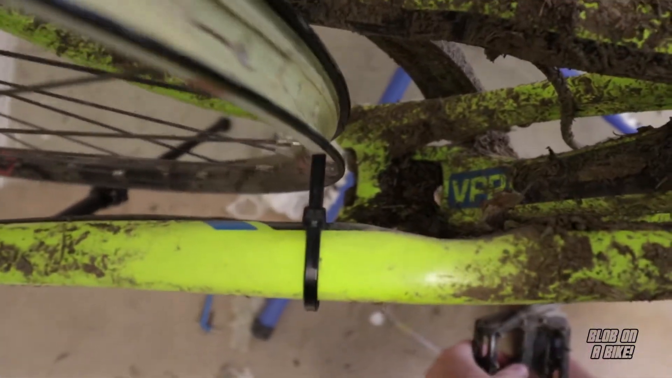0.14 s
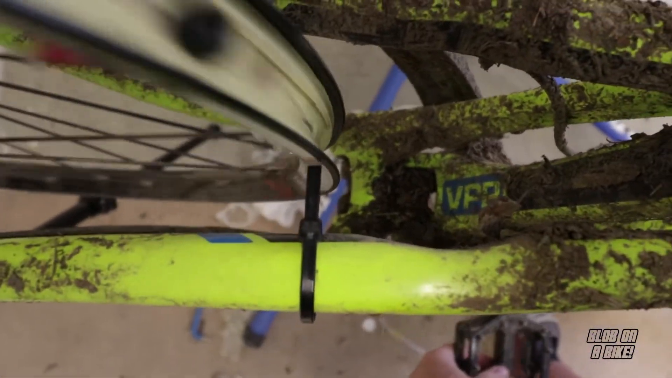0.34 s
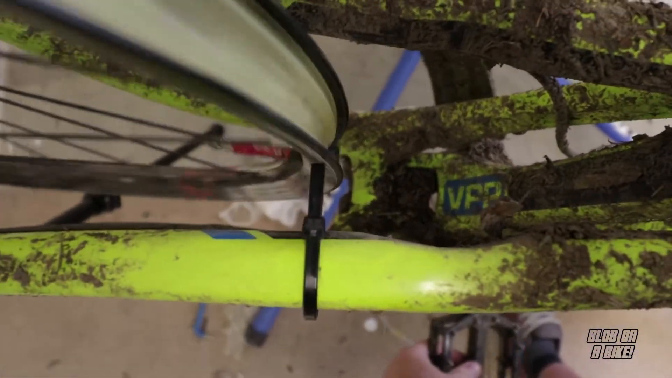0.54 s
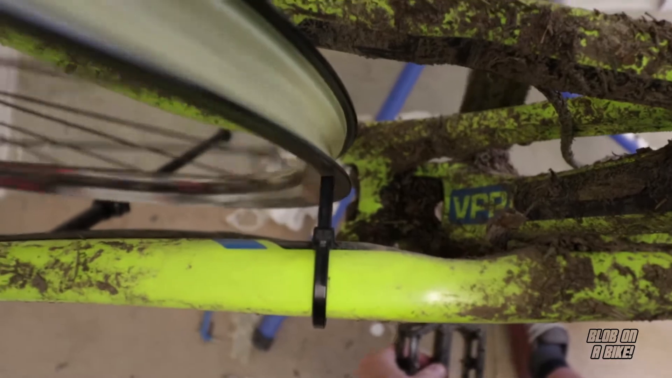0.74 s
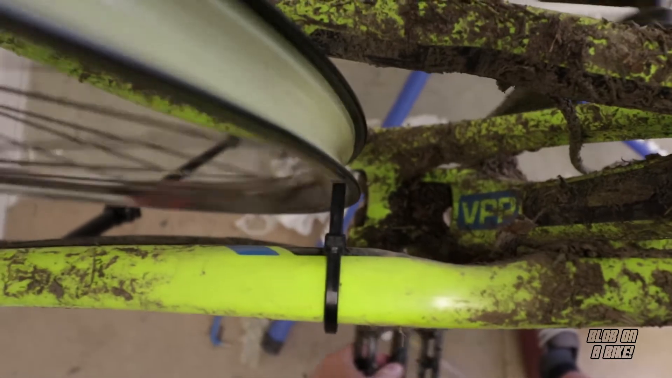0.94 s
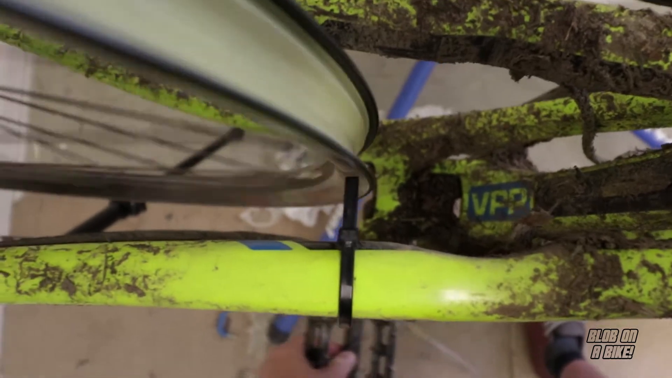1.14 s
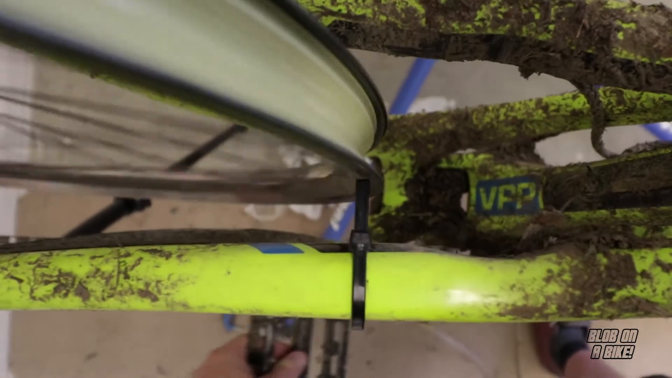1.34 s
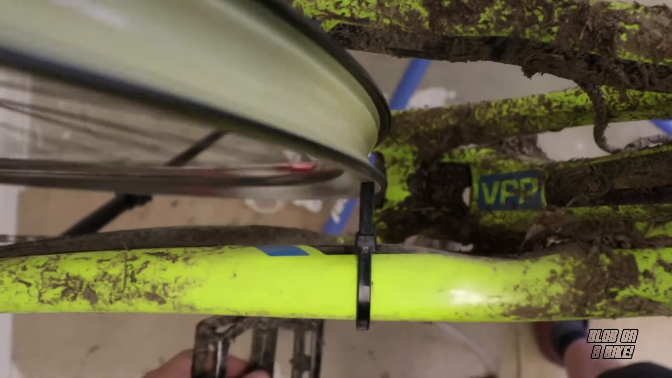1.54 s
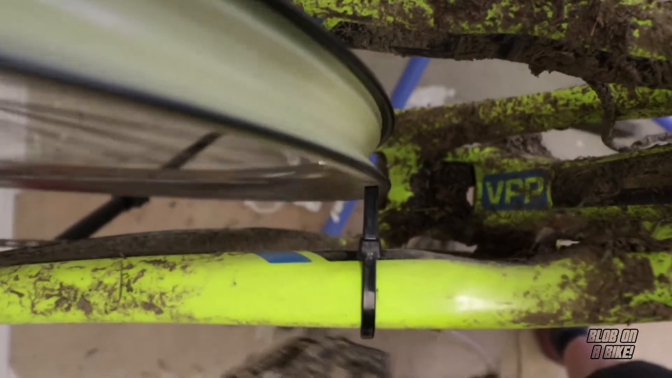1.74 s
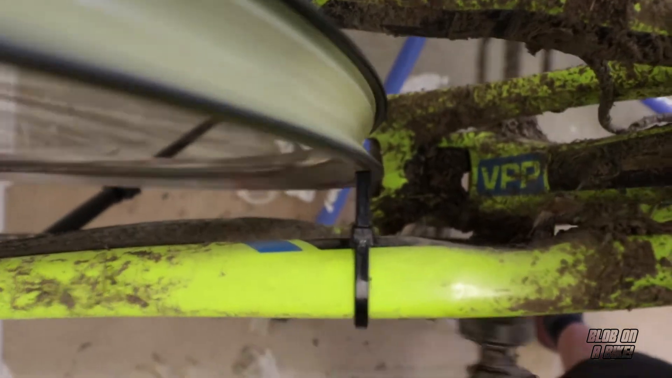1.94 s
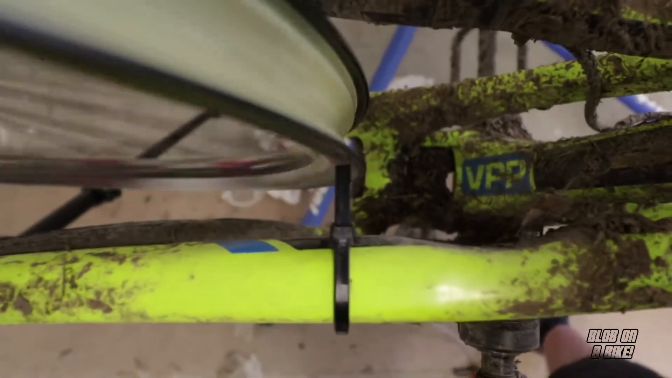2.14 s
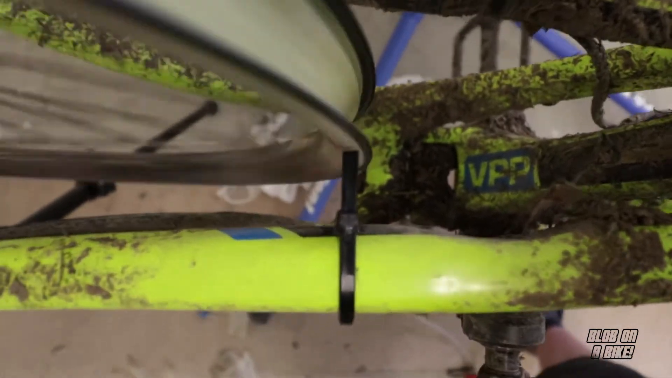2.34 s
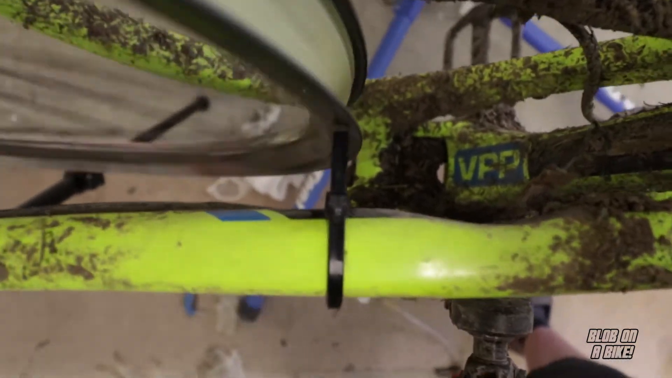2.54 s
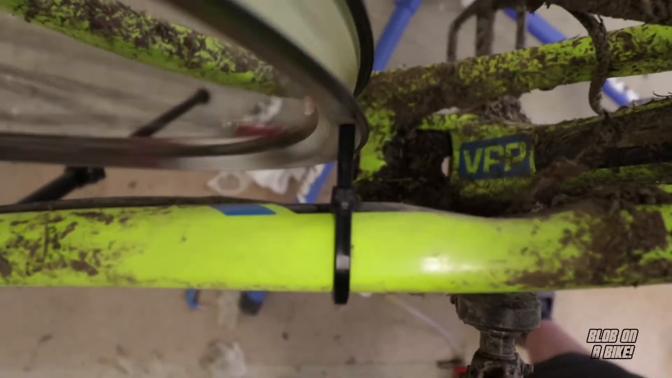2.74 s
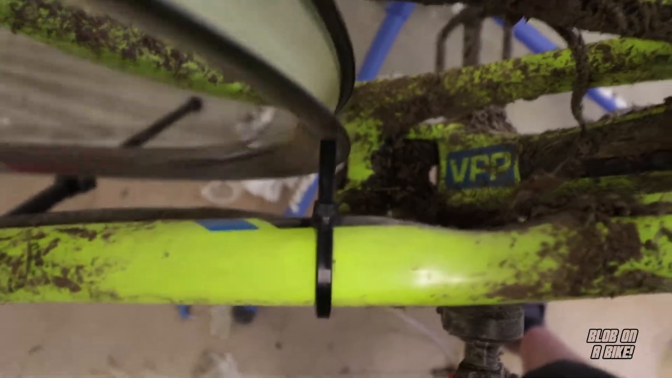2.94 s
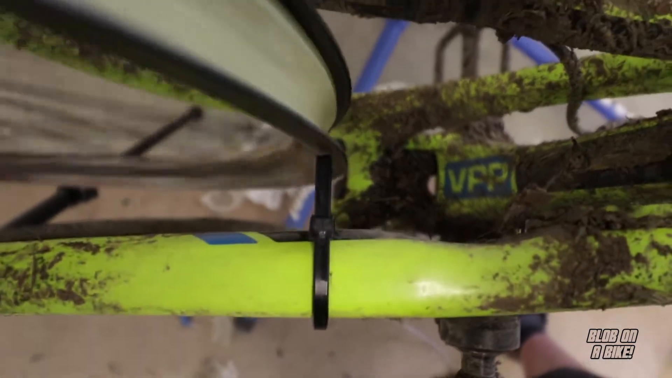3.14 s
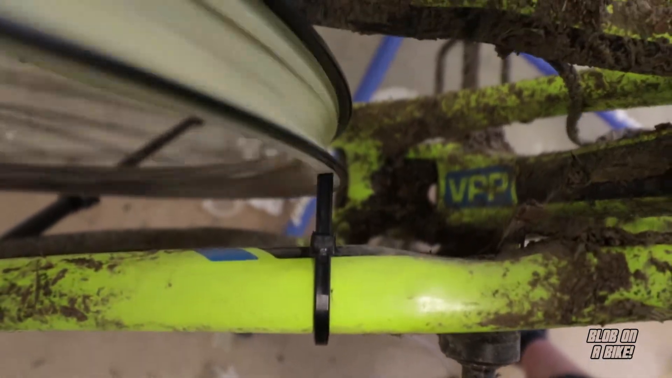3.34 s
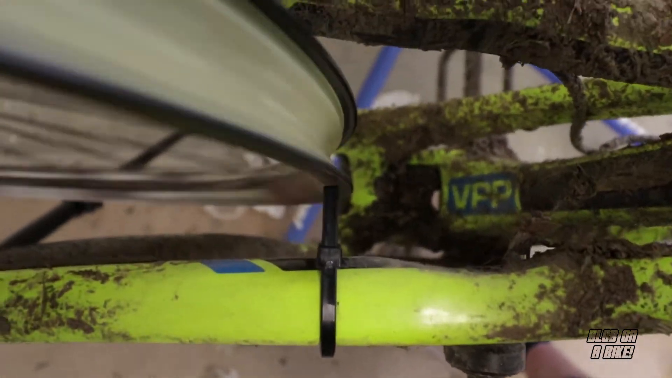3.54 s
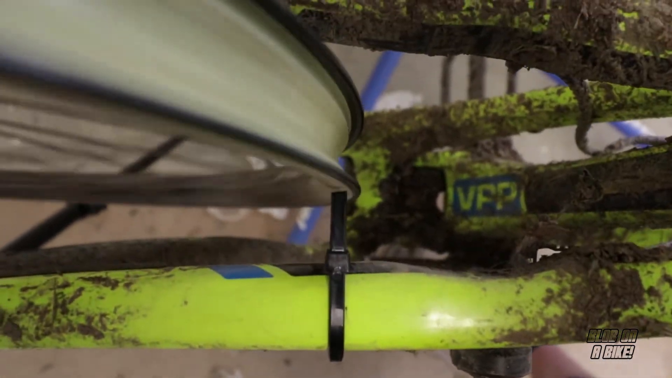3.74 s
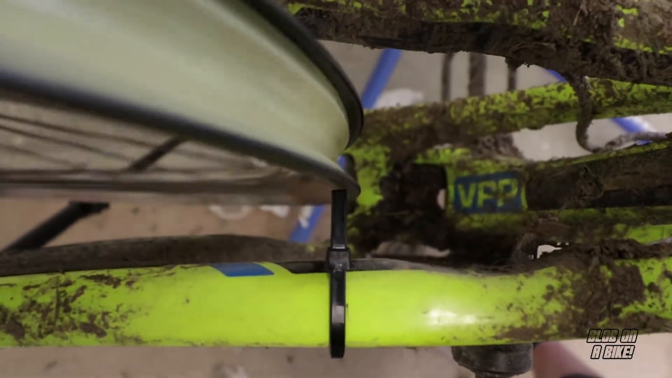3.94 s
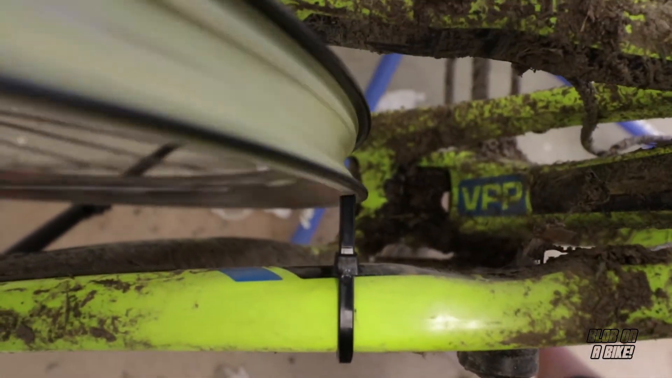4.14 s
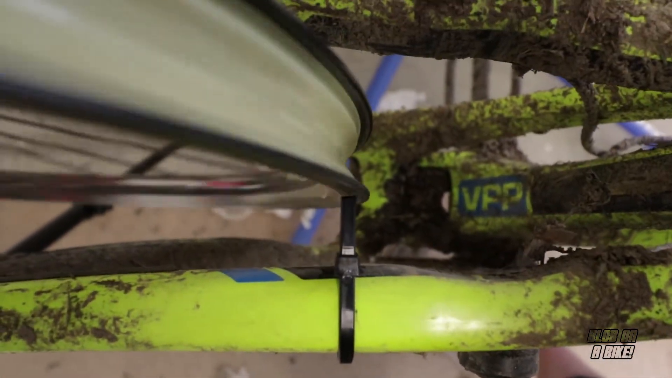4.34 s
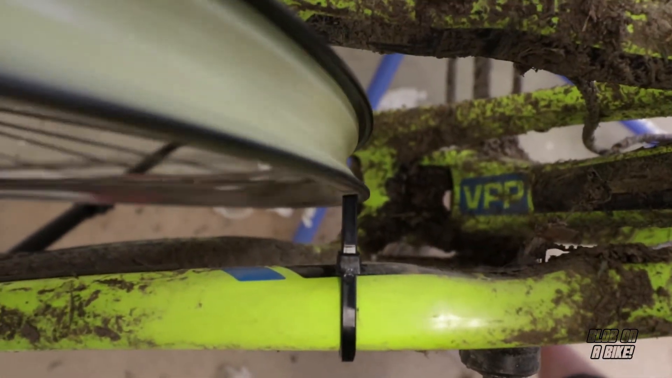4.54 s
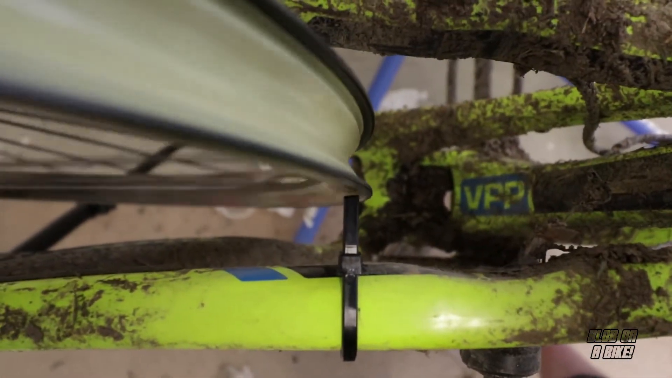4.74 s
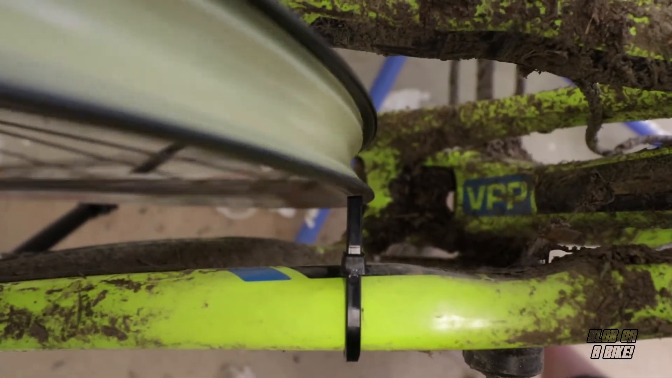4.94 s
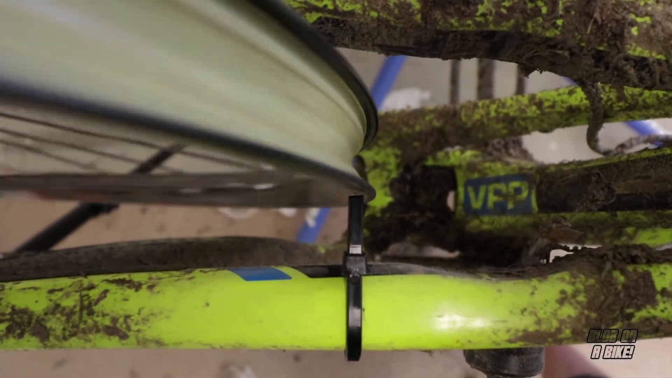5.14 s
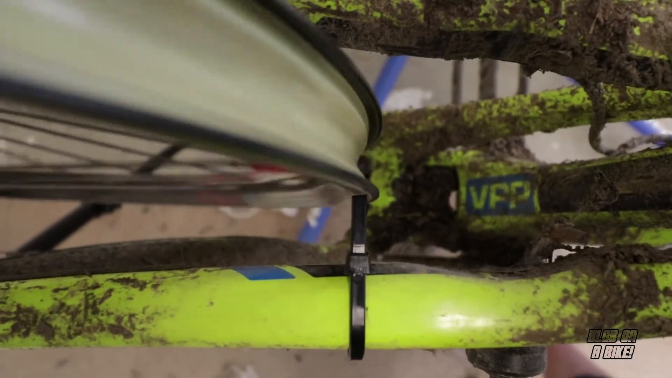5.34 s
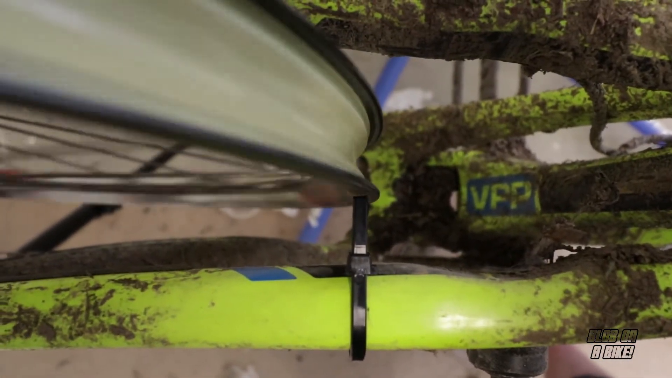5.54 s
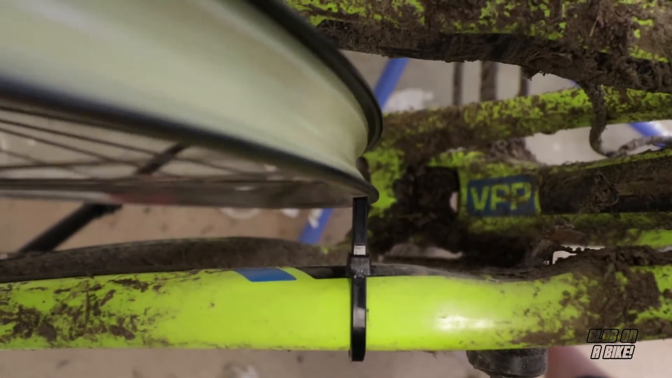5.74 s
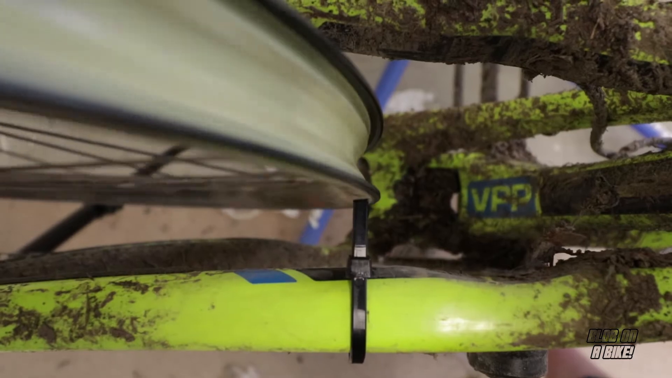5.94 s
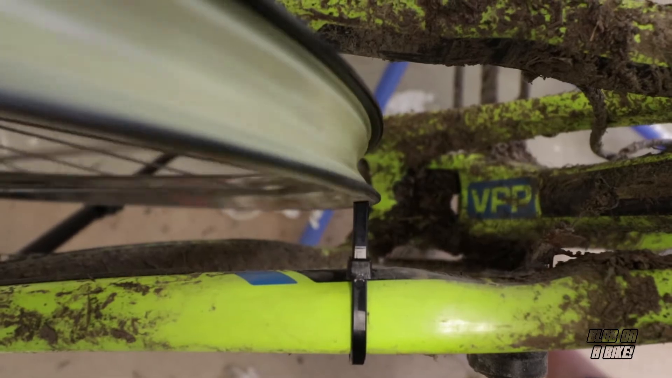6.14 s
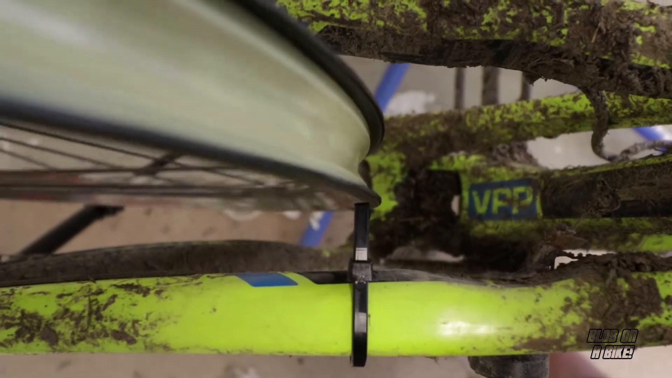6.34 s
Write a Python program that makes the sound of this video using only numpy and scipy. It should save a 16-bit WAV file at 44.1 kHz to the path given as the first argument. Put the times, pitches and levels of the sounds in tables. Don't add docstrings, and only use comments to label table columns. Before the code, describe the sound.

A small, hard-walled workshop with a faint low compressor hum. A pedal knocks, the chain ticks and dry parts rustle as a bicycle wheel is cranked by hand. After two seconds the wheel is let go and the freewheel breaks abruptly into a loud, bright metallic buzz, its fast clicks slowing steadily but still rapid at the end. One close microphone, with lively room reflections.

```python
import sys
import numpy as np
from scipy import signal
from scipy.fft import rfft, irfft
from scipy.io import wavfile
from scipy.ndimage import uniform_filter1d

SR = 44100
rng = np.random.default_rng(int(sys.argv[2]) if len(sys.argv) > 2 else 0)


def pcm_store(signal):
    levels = np.round(np.clip(np.atleast_2d(signal), -1, 1) * 32767)
    wavfile.write(sys.argv[1], SR, levels.astype(np.int16).T)


def convert_level_to_amplitude(level_db):
    exponent = np.asarray(level_db, float) / 20
    return 10 ** exponent


N = 282240
RELEASE_S = 1.986
WHEEL_TURN_TEETH = 40.115
LAST_TOOTH = 198


def unit(x):
    return x / np.sqrt(np.mean(x ** 2))


def colour(x, points):
    hz, db = np.transpose(points)
    bins = np.maximum(np.arange(N // 2 + 1) * SR / N, 1)
    gain = convert_level_to_amplitude(np.interp(np.log(bins), np.log(hz), db))
    return irfft(rfft(x) * gain, N)


def ring(x, hz, width_hz):
    return signal.lfilter(*signal.iirpeak(hz, hz / max(width_hz, 5), SR), x)


def ring_twice(x, hz, first_width_hz, width_hz):
    return ring(ring(x, hz, first_width_hz), hz, width_hz)


def blows(s, db):
    out = np.zeros(N)
    at = np.clip((s * SR).astype(int), 0, N - 1)
    np.add.at(out, at.ravel(), convert_level_to_amplitude(db).ravel())
    return out


def burst(x, decay_s):
    fading = signal.lfilter([1], [1, -np.exp(-1 / (decay_s * SR))], x)
    return fading * rng.standard_normal(N)


# (frequency [Hz], time to fade by 60 dB [s])
ROOM_FADE = [(300, 0.48), (2000, 0.73), (5000, 0.48), (12000, 0.21)]


def room(x, wet_db, changes_per_s=12, count=2):
    t = np.arange(SR // 2) / SR
    middles = [np.sqrt(a[0] * b[0]) for a, b in zip(ROOM_FADE, ROOM_FADE[1:])]
    edges = [100] + middles + [18000]
    tails = 0
    for (hz, t60), low, high in zip(ROOM_FADE, edges, edges[1:]):
        band_filter = signal.butter(2, (low, high), "band", fs=SR, output="sos")
        band = signal.sosfilt(band_filter, rng.standard_normal((count, len(t))))
        tails = tails + band * convert_level_to_amplitude(-60 * t / t60)
    tails = tails * np.clip(t / 0.0029, 0, 1)
    tails = tails / np.sqrt(np.sum(tails ** 2, axis=1, keepdims=True))
    away = (np.arange(N) / SR * changes_per_s - np.arange(count)[:, None] + 1) % count - 1
    share = np.cos(np.pi / 2 * np.clip(away, -1, 1))
    echoes = signal.fftconvolve(x * share, tails, axes=1)[:, :N].sum(axis=0)
    return x + convert_level_to_amplitude(wet_db) * echoes


# (multiple of the hum pitch [1], level [dB])
STRONG_HUM = [(3, -9), (4, 0), (5, -10), (8, -7), (9, -13), (10, -10), (12, -11), (13, -8), (14, -9),
              (15, -11), (32, -18), (35, -12), (36, -13), (38, -11), (39, -12), (40, -15), (47, -18),
              (51, -20), (53, -18)]


def compressor():
    hum_hz, casing_hz, casing_width_hz, casing_db = 30.44, 1190, 110, 10
    t = np.arange(N) / SR
    order = np.arange(2, 60)
    casing = casing_db * np.exp(-((order * hum_hz - casing_hz) / casing_width_hz) ** 2)
    level_db = -29.5 + 0.05 * order + 3.5 * rng.standard_normal(len(order)) + casing
    strong = dict(STRONG_HUM)
    hum, steps = 0, np.arange(N // 4410 + 2)
    for k, weak_db in zip(order, level_db):
        waver_db = min(0.14 * k, 2.4) * rng.standard_normal(len(steps))
        waver = convert_level_to_amplitude(strong.get(k, weak_db) + waver_db)
        tone = np.sin(2 * np.pi * (k * hum_hz * t + rng.random()))
        hum = hum + np.interp(t * 10, steps, waver) * tone
    return convert_level_to_amplitude(-58) * unit(hum)


# (frequency [Hz], level [dB per Hz])
AIR_COLOUR = [(15, -57), (25, -20), (48, -6), (120, 0), (190, -0.5), (416, -1.5), (714, -10), (1160, -14),
              (1330, -8), (1560, -42), (1840, -20), (11600, -43), (16000, -80)]


def room_air():
    return convert_level_to_amplitude(-62) * unit(colour(rng.standard_normal(N), AIR_COLOUR))


def scuff_and_shudder():
    scuff_s, rise_s, hold_s, fade_s, scuff_db, grows_db = 5.06, 0.058, 0.24, 0.07, -63.5, 10
    t = np.arange(N) / SR
    age = t - scuff_s
    drag = np.clip(age / rise_s, 0, 1) * np.exp(-np.maximum(age - hold_s, 0) / fade_s)
    drag = drag * convert_level_to_amplitude(scuff_db + grows_db * np.clip(age / hold_s, 0, 1))
    scuff = unit(ring_twice(rng.standard_normal(N), 236, 140, 130)) * drag
    swell = convert_level_to_amplitude(-68) * np.exp(-((t - 1.72) / .22) ** 2)
    shudder = unit(ring_twice(rng.standard_normal(N), 85, 50, 50)) * swell
    return scuff + shudder


# (frequency [Hz], width [Hz], level [dB])
CHAIN_MODES = [(1610, 100, 1), (2020, 270, -0.5), (2800, 470, 2), (3400, 170, 3), (3710, 140, 4),
               (4270, 290, -11)]
# (time [s],
# frame level [dB], hiss level [dB], rise [s], fade [s])
JERKS = [(0.111, -58.5, -77, 0.0012, 0.059), (0.738, -61, -79, 0.0017, 0.019),
         (0.574, -69, -78, 0.0018, 0.056), (.77, -65, -88, .02, 0.042), (.81, -65.5, -74, .005, 0.078),
         (0.956, -54.5, -91, 0.001, 0.071), (1.005, -62, -66.5, 0.0033, 0.086),
         (1.12, -71, -78, 0.033, 0.31), (1.26, -68, -80, .01, 0.078), (1.382, -66, -69.5, 0.0033, 0.21),
         (1.467, -61, -71, 0.0033, .05), (1.496, -66, -84, 0.0018, 0.13), (1.67, -63.5, -76, 0.0062, 0.088),
         (1.74, -61.5, -66.5, 0.029, 0.094), (1.83, -67, -78, 0.013, 0.27)]


def rustle():
    grains = rng.standard_normal(N) * convert_level_to_amplitude(2.3 * rng.exponential(size=N))
    body = sum(convert_level_to_amplitude(db) * ring(grains, hz, 1.16 * width) for hz, width, db in CHAIN_MODES)
    body = unit(signal.sosfilt(signal.butter(2, 4700, fs=SR, output="sos"), body))
    hiss = unit(colour(grains[::-1], [(3000, -22), (5500, 0), (11000, -5), (16000, -14)]))
    t = np.arange(2 * SR) / SR
    power = np.zeros((2, N))
    for s, frame_db, hiss_db, rise_s, fade_s in JERKS:
        age = np.maximum(t - s, 0)
        swell = (1 - np.exp(-age / rise_s)) * np.exp(-age / fade_s)
        power[:, :len(t)] += (convert_level_to_amplitude(np.array([[frame_db], [hiss_db]])) * swell) ** 2
    return np.sqrt(power[0]) * body + np.sqrt(power[1]) * hiss


# (time [s], peak level [dB], push direction [+1 or -1], kind [0 pedal, 1 chain])
HITS = [
    (.12, -45, 1, 1),
    (.0068, -36, -1, 0),
    (0.11, -29.8, 1, 1),
    (.7049, -56, 1, 1),
    (0.7365, -29.5, -1, 0),
    (1.9089, -35.5, 1, 0),
]
# (frequency [Hz], width [Hz], level [dB])
HIT_MODES = [
    [(584, 160, 15.5), (1250, 830, 21.5), (2300, 230, 4), (4000, 550, -14)],
    [(2320, 1200, 5), (2160, 380, -5), (3620, 540, -3), (6550, 3500, -8), (10500, 4000, 4)],
]
# (contact time [s], bounce level [dB])
HIT_CONTACT = [
    (0.00023, -4),
    (.00012, -1.5),
]


def knocks():
    out = np.zeros(N)
    for s, db, sign, kind in HITS:
        kind = int(round(kind))
        contact_s, bounce_db = HIT_CONTACT[kind]
        push = blows(np.array([s, s + 0.001334]), np.array([0, bounce_db]))
        push = np.convolve(push, np.hanning(int(contact_s * SR) + 3))[:N]
        body = sum(convert_level_to_amplitude(mode_db) * ring(push, hz, width) * 500 / width
                   for hz, width, mode_db in HIT_MODES[kind])
        out += np.sign(sign) * body * convert_level_to_amplitude(db) / np.abs(body).max()
    return out


def wheel():
    start_s, start_teeth_s = 1.9781, 71.133
    drag, drag_eases_per_tooth = 5.687, .0111
    rub, rub_at_tooth, rub_width_teeth = 33.246, 26.39, 3.47
    heavy_spot, heavy_spot_rises_tooth = 6.495, -3.757
    step = .01
    angle = np.arange(-.1, LAST_TOOTH + 3, step)
    half_turn = WHEEL_TURN_TEETH / 2
    off_rub = (angle - rub_at_tooth + half_turn) % WHEEL_TURN_TEETH - half_turn
    torque = drag - drag_eases_per_tooth * angle
    torque = torque + rub * np.exp(-.5 * (off_rub / rub_width_teeth) ** 2)
    torque = torque + heavy_spot * np.sin(2 * np.pi * (angle - heavy_spot_rises_tooth) / WHEEL_TURN_TEETH)
    speed = np.sqrt(np.maximum(start_teeth_s ** 2 - 2 * np.cumsum(torque) * step, 1))
    return start_s + np.cumsum(step / speed), angle, speed


def tooth_edges(motion):
    s, teeth, _ = motion
    tooth = np.arange(1, LAST_TOOTH)
    return tooth, np.interp(tooth - .1, teeth, s)


def facing(motion, at_tooth, order):
    s, teeth, _ = motion
    turned = np.interp(np.arange(N) / SR, s, teeth) - at_tooth
    return np.cos(order * 2 * np.pi * turned / WHEEL_TURN_TEETH)


# (catch level [dB], catch time [s], weak start level [dB], take-up time [s])
BITE = [
    (14.5, 0.0093, -12.5, 0.033),
    (24, 0.0085, -14.5, 0.029),
    (4, .012, -7.5, 0.28),
]


def loudness(motion, part, level_db, speed_db):
    s, _, teeth_s = motion
    t = np.arange(N) / SR
    age = np.maximum(t - RELEASE_S, 0)
    octaves = np.log2(np.interp(t, s, teeth_s) / 45)
    catch_db, catch_s, weak_db, up_s = BITE[part]
    bite_db = catch_db * np.exp(-age / catch_s) + weak_db * np.exp(-age / up_s)
    return level_db + speed_db * octaves + bite_db


# (frequency [Hz], width [Hz], level [dB])
RIM_MODES = [(600, 40, -4), (690, 40, -8), (770, 45, -5), (845, 70, 1), (950, 80, -3), (1240, 60, -7),
             (1370, 50, -5)]
# (top of group [Hz], level [dB], loudest at [tooth],
# swing once a turn [dB], swing twice a turn [dB], loudest of that at [tooth])
RIM_GROUPS = [
    (740, 7, 1, 2.5, 1.5, 0.89),
    (1100, 2.3, 30, 4, 2.7, 16.7),
    (1500, 8.5, 53, -1, 2, 10.5),
]


def rim(motion):
    _, edge = tooth_edges(motion)
    late_s = .00005 * uniform_filter1d(rng.standard_normal(len(edge)), size=2)
    when = np.maximum(edge - .006 + late_s, RELEASE_S)
    push = blows(when, 1.2 * rng.standard_normal(len(edge)))
    beams = []
    for _, db, at, once_db, twice_db, at_twice in RIM_GROUPS:
        swing_db = once_db * facing(motion, at, 1) + twice_db * facing(motion, at_twice, 2)
        beams.append(convert_level_to_amplitude(db + swing_db))
    group = np.searchsorted([row[0] for row in RIM_GROUPS], [row[0] for row in RIM_MODES])
    out = 0
    for k, (hz, width, db) in enumerate(RIM_MODES):
        mode = ring_twice(push, hz, 1.5 * width, width)
        out = out + (-1) ** k * convert_level_to_amplitude(db) * beams[group[k]] * mode
    return convert_level_to_amplitude(loudness(motion, 2, -59, 4.5)) * unit(out)


def strike(modes, when, blow_db, spread_db, scrape_s):
    out = 0
    for hz, width, db in modes:
        lag_s = .00012 * rng.standard_normal(when.shape)
        push = blows(when + lag_s, db + blow_db + spread_db * rng.standard_normal(when.shape))
        if scrape_s:
            push = burst(push, scrape_s)
        out = out + ring_twice(push, hz, 4 * width, width)
    return unit(out)


# (drop after the tooth edge [ms], timing scatter [ms], shell level [dB], spring level [dB])
PAWL_DROPS = [(-7, .8, 0, -9), (0, .8, 1, 0), (-3.5, 1.2, -5, -4), (2.5, 1.2, -8, -1), (8, 3.5, -16, -4)]
# (frequency [Hz], level [dB per Hz])
CRACK_COLOUR = [(500, -33.5), (1200, -20), (1900, -12), (3000, -7), (4300, -5), (6900, -7), (9000, 0.5),
                (12500, -2.5), (14200, -3), (15600, -3), (18000, -4.5)]
# (frequency [Hz], width [Hz], level [dB])
BEAD_MODES = [(3640, 390, -7.5), (3688, 79, -1.5), (3796, 75, 2.5), (3930, 75, -2)]
# (frequency [Hz], width [Hz], level [dB])
SHELL_MODES = [(1796, 70, -17), (2064, 163, -13.5), (2600, 89, -7.5), (2848, 105, -9.5), (3115, 280, -10),
               (3080, 32, -30), (4300, 240, -15)]
# (frequency [Hz], width [Hz], level [dB])
SPRING_MODES = [(5057, 88, -2), (5840, 29, -24), (5790, 130, -6.5), (6510, 320, -8.5), (7760, 270, -6),
                (7860, 194, -3), (8360, 53, 1.5), (9390, 99, 1.5), (10530, 63, -2), (10700, 140, -20),
                (11320, 90, -2.5), (13300, 300, -33)]


def freewheel(motion):
    tooth, edge = tooth_edges(motion)
    after_ms, scatter_ms, shell_db, spring_db = np.transpose(PAWL_DROPS)
    scatter = rng.standard_normal((len(tooth), len(PAWL_DROPS)))
    when = edge[:, None] + (after_ms + scatter_ms * scatter) / 1000
    wear = rng.standard_normal((40, 1))[tooth % 40]
    force_db = 0.6 * wear + .8 * rng.standard_normal(when.shape)
    when = np.maximum(when, RELEASE_S)

    landings = blows(when + 0.0038, spring_db + 0.54 * force_db)
    chatter = uniform_filter1d(landings, size=150, origin=-74)
    crack = unit(colour(burst(chatter, 0.0031), CRACK_COLOUR))
    high = signal.sosfiltfilt(signal.butter(3, 4800, "high", fs=SR, output="sos"), crack)

    bead = strike(BEAD_MODES, when, shell_db + force_db, 1.5, 0)
    shell = convert_level_to_amplitude(-3.5) * bead + convert_level_to_amplitude(-7.0) * unit(crack - high)
    shell = shell + convert_level_to_amplitude(-6.5) * strike(SHELL_MODES, when, shell_db + force_db, 3.5, 0)
    spring = convert_level_to_amplitude(-4.5) * strike(SPRING_MODES, when, spring_db + force_db, 1.2, 0.0023) + unit(high)

    sway_db = 0.38 * facing(motion, 18.8, 2)
    shell_gain = convert_level_to_amplitude(loudness(motion, 0, -33.5, 0) + sway_db)
    spring_gain = convert_level_to_amplitude(loudness(motion, 1, -36 - 6.5, -0.2))
    hub = convert_level_to_amplitude(-7.5) * shell_gain * shell + spring_gain * spring
    return hub, shell_gain * convert_level_to_amplitude(-10) * bead


def scene():
    motion = wheel()
    background = compressor() + room_air() + scuff_and_shudder()
    cranking = room(knocks() + rustle(), -15.5, count=2)
    hub, beam = freewheel(motion)
    spinning = room(hub, 2, count=6) + beam + room(rim(motion), -5, 0.44, count=2)
    mono = background + cranking + spinning
    return np.array([mono, mono])


def band_limit(x):
    return signal.sosfilt(signal.butter(12, 16630, fs=SR, output="sos"), x)


def record(dry):
    cut = signal.sosfilt(signal.ellip(10, .2, 80, 15750, fs=SR, output="sos"), dry)
    return band_limit(cut)


dry = scene()
out = record(dry)
pcm_store(out)
```